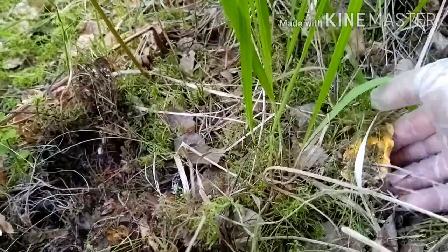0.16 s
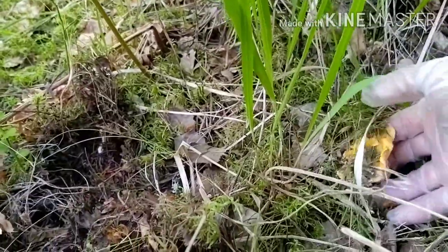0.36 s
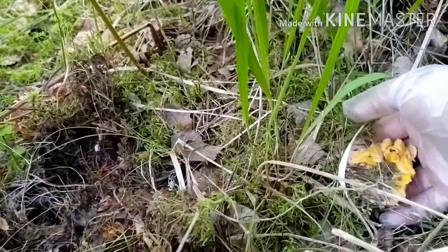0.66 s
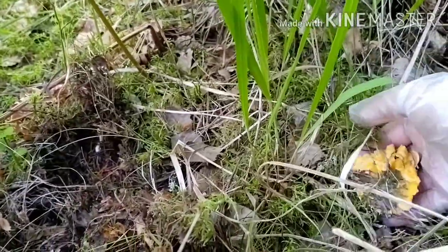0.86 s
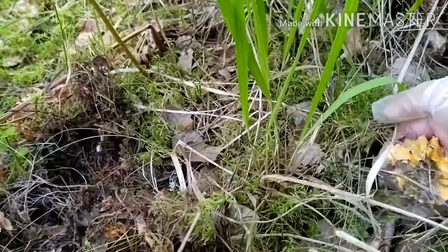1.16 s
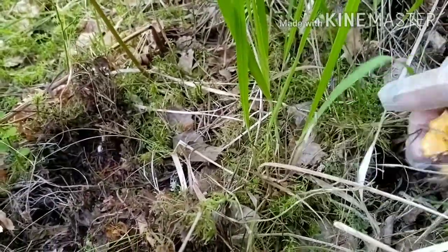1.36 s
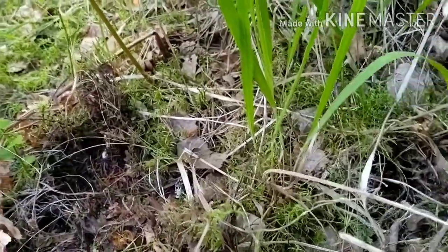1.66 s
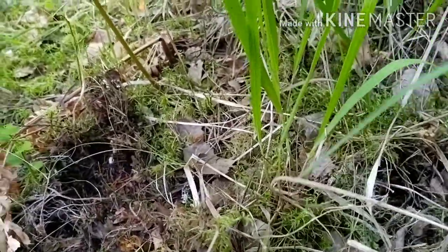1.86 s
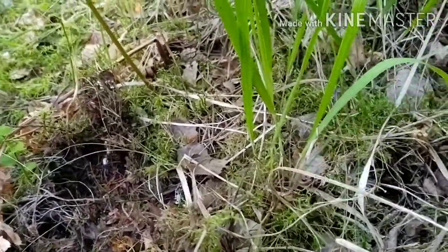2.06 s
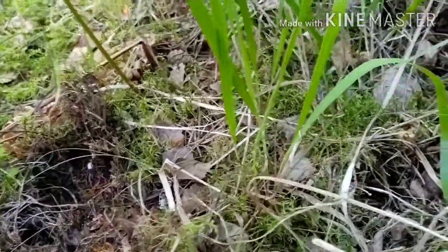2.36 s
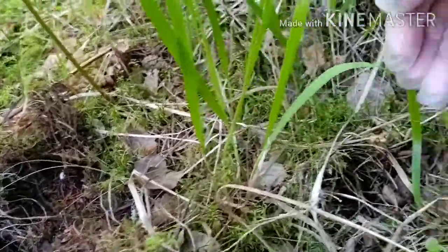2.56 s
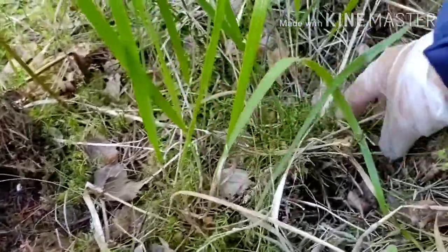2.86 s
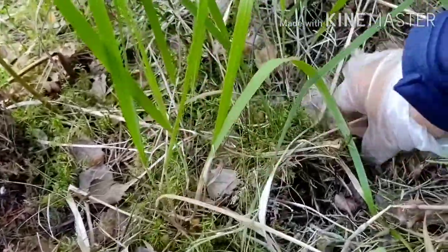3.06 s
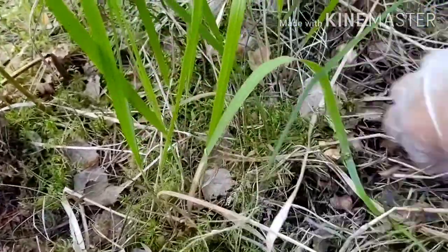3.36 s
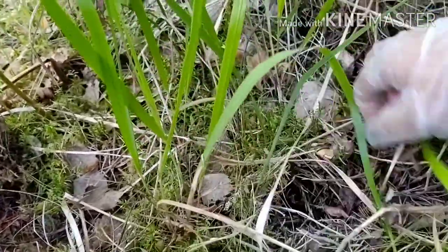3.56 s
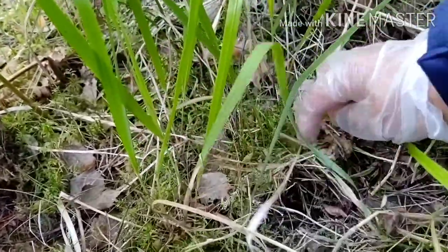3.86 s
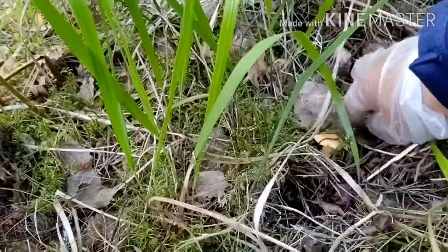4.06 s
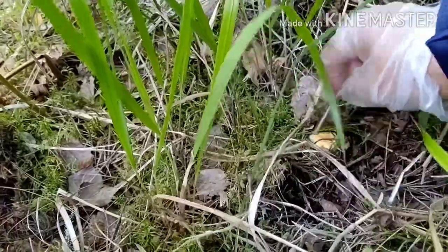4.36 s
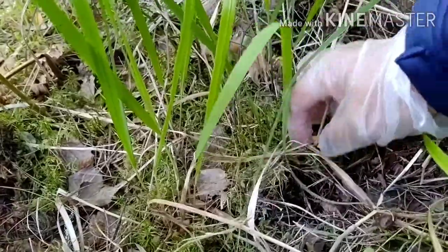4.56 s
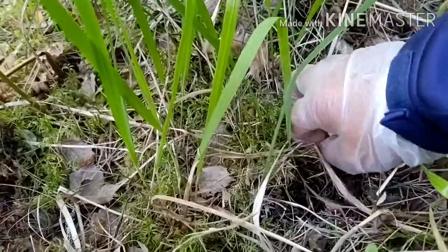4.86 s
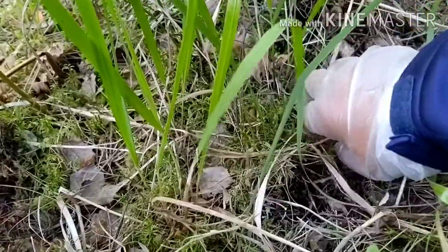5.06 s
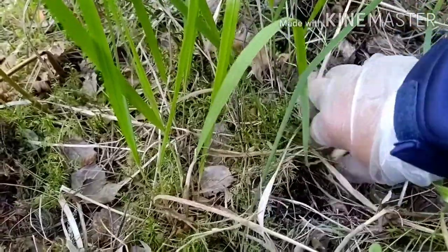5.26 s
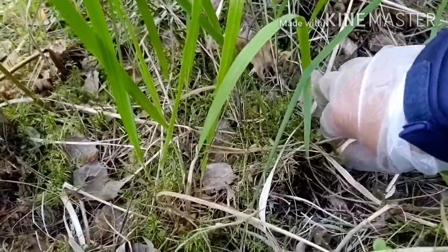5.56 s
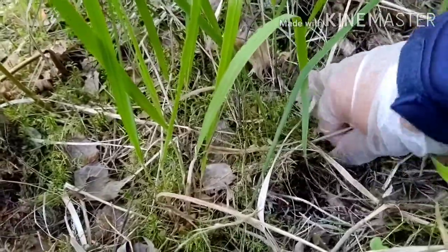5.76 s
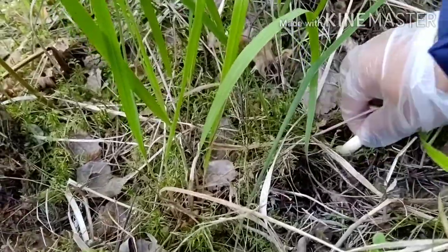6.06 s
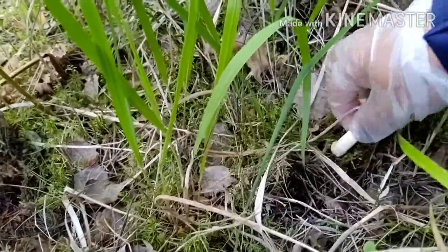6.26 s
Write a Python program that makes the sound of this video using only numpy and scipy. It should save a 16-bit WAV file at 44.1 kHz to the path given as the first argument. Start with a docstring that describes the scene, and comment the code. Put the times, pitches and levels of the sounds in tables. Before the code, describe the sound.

Close and mostly to the right, a thin plastic glove moves through grass and moss in quiet, dry woodland. A small burst of crinkles and snaps opens the scene, followed by faint, sparse rustles until about 1.1 s. The crinkling then swells, with sharp crease snaps near 1.55-1.6 s. From 1.8 to 3.1 s it is brighter and nearly continuous, with grass scraping below; a soft deep thump at 1.9 s and muffled hollow swells around 2-2.2 s. The loudest crackle comes at 3.2-3.45 s, with crisp snaps and a dull knock. Another thump and hollow swell come at 3.8 s, then moss tears in a quick volley at 4.13 s. After 4.3 s only light scrapes remain, with twig clicks and knocks around 4.6, 4.8 and 5.3 s, a firmer rustle and knock at 5.9 s, and tiny ticks until 6.4 s. Low rumble, thin hiss and a faint wavering motor drone lie behind.

```python
"""Small crinkles and snaps, close by and to the right: a gloved hand works through grass and moss in a quiet woodland.
The thin plastic film buckles in dense tiny slips, blades and litter scrape along it, creases and stalks snap.
One tuft of moss tears loose in a volley of breaks; fingers knock on the ground and click twigs, both rung as resonances.
Two soft, deep thumps are short sine bursts; muffled, hollow swells are uneven noise in a few resonances.
Behind lie a low rumble and a thin hiss of coloured noise, and a faint drone of two wavering sines."""
import sys
import numpy as np
from scipy import signal
from scipy.fft import rfft, irfft
from scipy.io import wavfile
from scipy.ndimage import uniform_filter1d

SR = 44100
rng = np.random.default_rng(int(sys.argv[2]) if len(sys.argv) > 2 else 0)


def inscribe(sig):
    """Save sig as 16-bit PCM at rate SR to the path in sys.argv[1].

    A 1-D sig is mono; a 2-D sig holds one channel per row.
    Samples are clipped to [-1, 1] before scaling.
    """
    pcm = np.round(np.clip(np.atleast_2d(sig).T, -1, 1) * 32767)
    wavfile.write(sys.argv[1], SR, pcm.astype(np.int16))


N = 282240   # samples, 6.4 s


def from_db(db):
    """Decibels to gain."""
    return 10 ** (np.asarray(db) / 20)


def rms_one(x):
    """Scale so that the mean of the channels has rms 1."""
    middle = np.atleast_2d(x).mean(axis=0)
    return x / np.sqrt(np.mean(middle ** 2) + 1e-20)


def in_time(rows):
    """Interpolate each column of a time curve to every sample."""
    s, *columns = np.transpose(rows)
    return [np.interp(np.arange(N) / SR, s, c) for c in columns]


def colour(x, spectrum):
    """Filter by a gain curve in dB, interpolated over log frequency."""
    hz, db = np.transpose(spectrum)
    grid_hz = np.maximum(np.fft.rfftfreq(N, 1 / SR), 1)
    gain_db = np.interp(np.log(grid_hz), np.log(hz), db)
    return irfft(rfft(x) * from_db(gain_db), N)


def drift(rate_hz):
    """Smooth chance bounded at 2, spread about 1, changing about rate_hz times a second."""
    grid_hz = np.fft.rfftfreq(N, 1 / SR)
    lowpass = 1 / (1 + (grid_hz / rate_hz) ** 2)
    slow = rms_one(irfft(rfft(rng.standard_normal(N)) * lowpass, N))
    return 2 * np.tanh(slow / 2)


def wander(x, depth_db, rate_hz, count=14):
    """As the contact moves over new folds and blades, the level of each band drifts by itself."""
    spectrum, out = rfft(x), 0
    place = np.sqrt(np.linspace(0, 1, spectrum.shape[-1])) * (count - 1)
    for k in range(count):
        band = np.maximum(1 - np.abs(place - k), 0)
        out = out + irfft(spectrum * band, N) * from_db(depth_db * drift(rate_hz))
    return out


def resonate(x, hz, width_hz):
    """Two-pole resonance with gain 1 on top."""
    r = np.exp(-np.pi * width_hz / SR)
    zeros = np.array([1, 0, -1]) * (1 - r * r) / 2
    poles = [1, -2 * r * np.cos(2 * np.pi * hz / SR), r * r]
    return signal.lfilter(zeros, poles, x + 1e-18)


def ring_width_hz(t60_s):
    """Bandwidth of a resonance that falls 60 dB in t60_s."""
    return np.log(1000) / (np.pi * t60_s)


def pan(x, left_db):
    """Tilt a pair between the channels by left minus right dB; equal channels keep their power."""
    gains = np.array([from_db(left_db) * np.ones(N), np.ones(N)])
    return x * gains / np.sqrt(np.mean(gains ** 2, axis=0))


LEFT_LAG_S = .000475   # the left side is further from the hand


def to_both_sides(x, scatter_db, scatter_s, lag_s=LEFT_LAG_S):
    """Direct sound reaches the left late; a brief scattered tail follows, different on each side."""
    t = np.arange(SR // 50) / SR
    paths = rng.standard_normal((2, len(t))) * np.exp(-t / scatter_s)
    paths *= from_db(scatter_db) / np.sqrt(np.sum(paths ** 2, axis=1, keepdims=True))
    lag_samples = round(lag_s * SR + rng.normal(0, 1))
    paths[0, max(lag_samples, 0)] += 1
    paths[1, 0] += 1
    pair = signal.oaconvolve(x[None], paths, axes=1)[:, :len(x)]
    return pair / np.sqrt(1 + from_db(2 * scatter_db))


def wide_noise(spectrum, side_db):
    """Coloured stereo noise; side_db sets the difference signal against the common one."""
    mid, side = rng.standard_normal((2, N))
    return rms_one(colour(mid + from_db(side_db) * side * [[1], [-1]], spectrum))


# Spectra of the far rumble and of the air hiss. Each row: frequency in Hz, relative density in dB per Hz.
RUMBLE = [(20, -34), (42, -32), (60, -6.5), (82, -12), (105, -1.5), (128, 4), (165, 0), (210, -4.5),
          (260, -7.5), (340, -22.5), (600, -20.5), (2000, -68), (16000, -66)]
AIR = [(100, -1), (400, -2), (540, -3), (680, 6), (850, -9.5), (1100, 5.5), (1400, -12), (1800, 9.5),
       (3000, -1.5), (6000, 6.5), (16000, -22)]
# Far motor. Each row: time in seconds, level of the low note in dB, level of its octave in dB.
DRONE = [(0, -78, -75), (1.0, -99, -71.5), (1.6, -87, -75.5), (3.7, -74.5, -78), (4.0, -74.5, -67),
         (4.9, -78, -68), (5.3, -70.5, -75.5), (5.9, -64, -88), (6.4, -66.5, -75)]
DRONE_HZ = 102.15   # centre of the wavering low note


def woodland(rumble_db, air_db, rumble_side_db, air_side_db):
    """Far rumble nearly alike on both sides, a thin wide hiss of air, and a wavering motor note with its octave."""
    low_db, octave_db = in_time(DRONE)
    note_hz = DRONE_HZ * (1 + 0.00713 * drift(2.8))
    phase = 2 * np.pi * np.cumsum(note_hz) / SR
    drone = np.sqrt(2) * (from_db(low_db) * np.sin(phase) + from_db(octave_db) * np.sin(2 * phase))
    far = from_db(rumble_db) * wide_noise(RUMBLE, rumble_side_db) + drone
    return pan(far, left_db=-0.5) + from_db(air_db) * wide_noise(AIR, air_side_db)


# Muffled, hollow swells of noise. Each row: middle in seconds, level in dB,
# seconds from the middle to 1/e of the power.
SWELLS = [(0.132, -73.5, 0.17), (1.986, -65, 0.064), (2.1, -63, 0.011), (2.173, -65, 0.091),
          (3.777, -62.5, 0.038), (3.835, -58.5, 0.026), (3.883, -61, 0.043)]
# Hollow resonances. Each row: frequency in Hz, relative level in dB, width in Hz.
SWELL_RESONANCES = [(490, -7.5, 140), (664, 0.5, 134), (835, -2.5, 200), (1760, -10, 300)]


def hollow_swells(rough_db, left_db):
    """Uneven, muffled noise swells and fades in a few hollow resonances."""
    t = np.arange(N) / SR
    power = 0
    for middle_s, db, half_s in SWELLS:
        power = power + from_db(db) ** 2 * np.exp(-np.minimum(((t - middle_s) / half_s) ** 2, 50))
    uneven_noise = rng.standard_normal(N) * from_db(rough_db * drift(40))
    hollow = 0
    for k, (hz, db, width_hz) in enumerate(SWELL_RESONANCES):
        hollow = hollow + from_db(db) * resonate(uneven_noise, hz, width_hz) * (-1) ** k
    pair = rms_one(to_both_sides(hollow, scatter_db=-5.5, scatter_s=0.0022, lag_s=.0001))
    return pan(np.sqrt(power) * pair, left_db)


# Soft, deep thumps. Each row: start in seconds, peak in dB, length in seconds, frequency in Hz.
THUMPS = [(1.92, -52, 0.049, 200), (3.804, -46.5, 0.041, 200)]


def thumps():
    """Each thump is a short low sine burst that swells and fades, alike on both sides."""
    out = np.zeros(N)
    for start_s, peak_db, length_s, hz in THUMPS:
        t = np.arange(N) / SR - start_s
        swell = np.sin(np.pi * np.clip(t / length_s, 0, 1))
        out += from_db(peak_db) * swell * np.sin(2 * np.pi * hz * t)
    return out


# Fingers meeting the ground. Each row: start in seconds, relative strength of the push in dB.
KNOCKS = [(3.357, -42), (4.598, -52), (5.3, -47.5), (5.9038, -42.5)]
# Ringing of packed moss and roots. Each row: frequency in Hz, relative level in dB, 60 dB decay in seconds.
GROUND = [(490, -13, 0.0057), (595, 13.5, 0.032), (644, 5.5, 0.02), (1020, -13, 0.012), (1780, 4, 0.008)]


def knocks(level_db, press_s, crush_share, crush_s):
    """A fingertip gives the ground one short push, crushing a little moss, and the ground answers dully."""
    push, t = np.zeros(N), np.arange(SR // 20) / SR
    press = t / press_s * np.exp(1 - t / press_s)
    for start_s, push_db in KNOCKS:
        start = round(start_s * SR)
        crush = crush_share * rng.standard_normal(len(t)) * np.exp(-t / crush_s)
        push[start:start + len(t)] += from_db(push_db) * (press + crush)
    body = sum(from_db(db) * resonate(push, hz, ring_width_hz(t60_s)) for hz, db, t60_s in GROUND)
    return from_db(level_db) * to_both_sides(body, scatter_db=-40, scatter_s=0.001)


# Thin twigs under the fingertips. Each row: start in seconds, relative level in dB, pitch in Hz.
TWIG_TICKS = [(4.5985, -46, 1100), (4.769, -45, 1350), (4.7945, -50, 1500), (4.9045, -53, 1300),
              (5.2995, -49, 1120), (6.2835, -51, 1450)]
# Modes of a twig. Each row: multiple of its pitch, relative level in dB, 60 dB decay in seconds.
TWIG = [(1.0, 6, 0.0071), (1.3, -1, 0.015), (1.62, -1, .01)]
TWIG_CRACK_DB = -23   # the bare crack beside the ring


def twigs(level_db, crack_s):
    """A twig gives a tiny crack and rings briefly, damped by the moss."""
    out, t = np.zeros((2, N)), np.arange(SR // 25) / SR
    for start_s, db, pitch_hz in TWIG_TICKS:
        crack = 0.22 * rng.standard_normal(len(t)) * np.exp(-t / crack_s)
        crack[0] += 1
        ring = from_db(TWIG_CRACK_DB) * resonate(crack, hz=3000, width_hz=4000)
        for k, (ratio, mode_db, t60_s) in enumerate(TWIG):
            mode = resonate(crack, ratio * pitch_hz, ring_width_hz(t60_s))
            ring = ring + from_db(mode_db) * mode * (-1) ** k
        tick = to_both_sides(ring / np.abs(ring).max(), scatter_db=-22, scatter_s=.001, lag_s=.00012)
        start = round(start_s * SR)
        out[:, start:start + len(t)] += from_db(db + level_db) * tick
    return out


# Spectrum of parting fibres. Each row: frequency in Hz, relative density in dB per Hz.
TEAR = [(100, -24), (330, -20), (480, -3), (750, -8), (1300, -5), (2100, -1.5), (3100, 3), (4400, 0),
        (6200, -1), (8000, 4.5), (16000, -14)]
TEAR_START_S, TEAR_SWELL_S, TEAR_FADE_S, TEAR_DB = 4.129, .015, .012, -37.5


def tear(fibres_per_s, spread_db, lag_s):
    """Fibres part in a quick dry volley that builds until the tuft lets go."""
    t = np.arange(N) / SR - TEAR_START_S
    fade = np.exp(-np.clip((t - TEAR_SWELL_S) / TEAR_FADE_S, 0, 20))
    pull = np.clip(t / TEAR_SWELL_S, 0, 1) * fade
    sizes = from_db(spread_db * rng.standard_normal(N)) * rng.choice([-1, 1], N)
    breaks = (rng.random(N) < fibres_per_s / SR) * sizes
    pair = to_both_sides(breaks, scatter_db=-10.0, scatter_s=0.0014, lag_s=lag_s)
    return from_db(TEAR_DB) * pull * rms_one(colour(pair, TEAR))


def grains(per_s, spread_db, clump_db, clump_hz, runs_per_s, run_db, run_s, scatter_db, scatter_s, count=32):
    """Tiny slips come in clumps, and now and then a short run sets in; each fold scatters in its own way."""
    sizes = from_db(spread_db * np.minimum(rng.exponential(1, N), 3.5)) * rng.choice([-1, 1], N)
    triggers = (rng.random(N) < runs_per_s / SR) * np.minimum(rng.exponential(1, N), 1.7)
    runs = signal.lfilter([from_db(run_db)], [1, -np.exp(-1 / (run_s * SR))], triggers + 1e-18)
    slips = sizes * (rng.random(N) < per_s / SR) / np.sqrt(per_s)
    slips = slips * from_db(clump_db * drift(clump_hz)) * (1 + runs)
    # a few folds are in play at a time; each run brings the next one
    fold = (np.cumsum(triggers > 0) + rng.integers(0, 4, N)) % count
    out = sum(to_both_sides(slips * (fold == k), scatter_db, scatter_s) for k in range(count))
    # the hand's pressure, not chance, sets the strength of a stroke: level out over 0.1 s
    return out / np.sqrt(uniform_filter1d(np.mean(out ** 2, axis=0), size=SR // 10) + 1e-12)


# Spectrum of dry litter, shared with the stalks. Each row: frequency in Hz, relative density in dB per Hz.
LITTER = [(30, -68), (150, -8.5), (350, -11), (600, -3.5), (1000, -5.5), (1400, -3), (1850, -2), (3000, -2),
          (5000, -3), (7500, -7), (11000, -8.5), (16000, -5)]


def grass(level_db):
    """Blades and dry litter stick and slip along the glove; a firmer push also stirs the dull moss beneath."""
    per_s = 4500 * from_db(.9 * (level_db + 55))
    slips = grains(per_s, spread_db=1.5, clump_db=1.35, clump_hz=40.5, runs_per_s=90, run_db=-4.5,
                   run_s=0.00071, scatter_db=8.0, scatter_s=0.0018)
    scrape = rms_one(colour(wander(slips, depth_db=2.0, rate_hz=5.7), LITTER))
    moss = colour(scrape, [(1200, 0), (1700, -30)])
    # a light touch misses the moss, and a fast sweep rides over it
    push_db = np.interp(level_db, [-70, -58, -47], [-6, 2.5, -.8])
    return from_db(level_db + 1.0) * (scrape + (from_db(push_db) - 1) * moss)


# Creases and stalks giving way. Each row: start in seconds, level before colouring in dB, length in seconds,
# woody part relative to that level in dB, woody ring in Hz.
SNAPS = [(0.026, -34, .002, -26, 2400), (0.0543, -31, .002, -28, 2400), (0.058, -30, 0.0047, -31, 2400),
         (0.092, -41, 0.0056, -32, 2400), (0.121, -29, 0.0027, -40, 2400), (0.393, -35, 0.0049, -21, 2400),
         (0.4065, -33, .0015, -19, 2400), (0.4985, -39.5, 0.0023, -8, 2080),
         (0.539, -39.5, 0.0016, -4, 2100), (0.5712, -40, 0.0011, -20, 2400), (0.5868, -30, .001, -22, 2390),
         (0.866, -44, .0015, -15, 2400), (1.086, -43, .006, -24, 2415), (1.295, -29, 0.00081, -30, 2400),
         (1.308, -28.5, 0.0035, -20, 2400), (1.5425, -21, .0012, -26, 4200), (1.5445, -27, .004, -18, 4200),
         (1.5598, -26, .0008, -28, 4200), (1.5908, -19, .002, -40, 4200), (1.5929, -10.5, .0016, -38, 4200),
         (1.659, -26, .0015, -16, 2400), (1.894, -32, .001, -30, 2400), (1.906, -26, 0.002, -30, 2400),
         (2.036, -29, 0.0012, -15, 2900), (2.063, -24, 0.0016, -26, 2400), (2.154, -27, 0.0054, -32, 2400),
         (2.25, -30.5, .003, -18, 2400), (2.311, -39, .003, -20, 2400), (2.382, -26, .002, -25, 2400),
         (2.432, -24, 0.011, -21, 1790), (2.504, -29.5, 0.0015, -13, 1400), (2.595, -24, 0.0042, -15, 1500),
         (2.641, -32, .001, -22, 2360), (2.754, -25, .0012, -25, 2410), (2.98, -24.5, 0.0095, -17, 2570),
         (3.085, -22.5, 0.0028, -23, 2400), (3.144, -33, .002, -25, 2400), (3.277, -29, .002, -1.5, 3300),
         (3.285, -28, .0015, -5, 3100), (3.3025, -19, 0.0012, -12, 7200), (3.3072, -24, .002, -13, 4600),
         (3.3447, -24, .0008, -13, 4000), (3.3835, -24, .0013, -18, 5800), (3.4, -27, .0016, -20, 5000),
         (3.4037, -18, .001, -21, 4600), (3.4283, -25, .0012, -18, 5000), (3.4405, -25, .0012, -18, 5000),
         (3.514, -28, .002, -24, 5000), (3.661, -23, 0.001, -24, 5000), (3.714, -29, .001, -24, 4200),
         (3.73, -22, 0.0012, -32, 4200), (3.833, -32, 0.00081, -26, 4200), (4.058, -31, 0.0018, -8, 2000),
         (4.099, -32, .0007, -22, 3600), (4.1105, -31, .002, -7, 1200), (4.1245, -28, .002, -20, 3600),
         (4.13, -22, 0.0008, -18, 3600), (4.165, -28, .0015, -14, 5500), (4.223, -30, .001, -15, 2000),
         (4.5975, -39, 0.0022, -1, 1700), (4.649, -42, .001, -4, 1700), (4.768, -37, .002, -6, 1750),
         (4.793, -37, .0012, -9, 2200), (4.824, -38, 0.009, -13, 6000), (4.9035, -40, .0016, -3, 2600),
         (5.2995, -46, .002, 0, 1300), (5.349, -45, .003, -8, 4600), (5.49, -47, .0031, -3.5, 2000),
         (5.687, -39.5, 0.014, -16, 2000), (5.7205, -41, 0.0006, 1, 3500), (5.8715, -40, .002, -3, 2000),
         (5.9045, -32, .0015, -8, 3600), (5.908, -32, .003, -13, 3000), (5.9215, -36, .001, -10, 1700),
         (5.9294, -31, .002, -13, 2400), (5.932, -35, 0.0038, -18, 2400), (6.021, -29, .0015, -22, 2400),
         (6.028, -31, .002, -26, 2400), (6.149, -39, .001, -19, 2400), (6.123, -40, 0.0023, -12, 2400),
         (6.198, -43.5, 0.012, -10, 1890), (6.282, -45, 0.0053, -2, 1890),
         (6.305, -41.5, 0.0046, -15, 2400), (6.365, -44, 0.0046, -1.5, 1900)]
# Spectrum of a snapping crease. Each row: frequency in Hz, gain in dB.
CREASE = [(300, -54), (2000, -37), (5000, -22.5), (7200, -12.5), (8600, -2), (11500, -1.5), (14700, -3),
          (16000, -8)]
SOFT_SNAP_TOP_DB = -6   # a gentle crease has less of the highest treble than a hard snap


def snaps(stalk_db, tail_s):
    """A crease gives way in a noise run that swells and dies within milliseconds; a dry stalk adds a woody ring."""
    film, soft, stalk, ring = np.zeros((4, 2, N))
    t = np.arange(SR // 32) / SR
    for start_s, peak_db, length_s, woody_db, ring_hz in SNAPS:
        fade = np.exp(-np.maximum(t - .7 * length_s, 0) / (length_s / 3))
        swell = np.minimum(t / (length_s / 4), 1) * fade
        run = to_both_sides(swell * rng.standard_normal(len(t)), scatter_db=-23, scatter_s=tail_s)
        # both sides get the energy of the swell
        run *= from_db(peak_db) * np.sqrt(np.sum(swell ** 2) / np.sum(run ** 2, axis=1, keepdims=True))
        own_ring = resonate(run, ring_hz, width_hz=550)
        softness = np.interp(peak_db, [-26, -18], [1, 0])
        start = round(start_s * SR)
        span, room = slice(start, start + len(t)), N - start
        film[:, span] += run[:, :room]
        soft[:, span] += softness * run[:, :room]
        stalk[:, span] += from_db(woody_db) * run[:, :room]
        ring[:, span] += from_db(woody_db) * own_ring[:, :room]
    woody = colour(stalk, LITTER) + ring
    soft_top = colour(soft, [(9500, -40), (12500, 0)])
    film = film + (from_db(SOFT_SNAP_TOP_DB) - 1) * soft_top
    return colour(film, CREASE), from_db(stalk_db) * woody


# Strokes through the grass. Each row: start in seconds, swell in seconds, hold in seconds,
# glove crinkle in dB, grass scrape in dB.
STROKES = [(0.0, 0.0011, 0.035, -48.5, -66), (0.091, .006, 0.1, -56, -69), (0.277, 0.042, .025, -57, -69),
           (0.366, 0.023, 0.023, -56.5, -65), (0.398, 0.099, 0.097, -51.5, -67),
           (0.606, 0.02, 0.043, -56, -65), (0.758, 0.02, 0.012, -60.5, -65.5),
           (0.999, 0.029, 0.021, -54, -66.5), (1.095, 0.0082, 0.023, -53, -68.5),
           (1.125, 0.23, .29, -44, -65.5), (1.595, 0.07, 0.17, -41.5, -60.5),
           (1.829, 0.056, 0.087, -41.5, -58.5), (1.982, 0.038, 0.06, -44.5, -55),
           (2.082, 0.043, 0.11, -44, -57.5), (2.275, 0.11, 0.13, -44.5, -57),
           (2.503, 0.039, 0.49, -39.5, -56.5), (3.029, 0.04, 0.078, -41.5, -54),
           (3.18, 0.086, 0.018, -42, -52), (3.264, 0.018, 0.078, -34, -47.5),
           (3.36, 0.024, 0.076, -36.5, -55), (3.453, 0.031, 0.35, -44, -60.5),
           (3.831, 0.078, 0.27, -45.5, -60.5), (4.104, 0.022, 0.039, -37, -54.5),
           (4.163, 0.037, 0.048, -43.5, -57), (4.309, 0.05, 0.023, -49, -62),
           (4.504, 0.034, 0.11, -53, -65.5), (4.733, 0.034, 0.014, -51, -66),
           (4.889, 0.0034, 0.019, -50, -62), (4.91, 0.016, 0.33, -79, -67.5),
           (5.477, 0.0046, 0.023, -58.5, -64), (5.634, 0.039, 0.082, -55.5, -65.5),
           (5.799, 0.082, 0.14, -49.5, -61), (6.108, 0.034, 0.071, -58.5, -69),
           (6.279, 0.097, 0.033, -53, -62.5)]
# Fingers fidgeting in the moss. Each row: time in seconds, glove crinkle in dB, grass scrape in dB.
FIDGET = [(0, -62.5, -67), (0.95, -67.5, -72.5), (2.2, -68, -64.5), (4.5, -61, -64), (5.1, -64.5, -67),
          (5.35, -66.5, -68), (5.38, -67.5, -73), (5.62, -64, -69.5), (5.7, -65, -69), (6.4, -61.5, -69)]
FIDGET_SWING_DB, FIDGET_RATE_HZ = 1.5, 14
RELEASE_S = 0.02   # time constant of a stroke's dying away


def hand():
    """Crinkle and scrape in dB: each stroke swells, holds and dies away, over the fidgeting of the fingers."""
    t = np.arange(N) / SR
    fidget_db = np.array(in_time(FIDGET)) + FIDGET_SWING_DB * drift(FIDGET_RATE_HZ)
    crinkle, scrape = from_db(fidget_db) ** 2
    for start_s, swell_s, hold_s, crinkle_db, scrape_db in STROKES:
        past_hold = np.clip((t - start_s - swell_s - hold_s) / RELEASE_S, 0, 20)
        power = (np.clip((t - start_s) / swell_s, 0, 1) * np.exp(-past_hold)) ** 2
        crinkle = crinkle + from_db(crinkle_db) ** 2 * power
        scrape = scrape + from_db(scrape_db) ** 2 * power
    return 10 * np.log10([crinkle, scrape])


# Spectrum of the film. Each row: frequency in Hz, relative density in dB per Hz.
FILM = [(300, -66), (1500, -22.5), (4000, -15.5), (6000, -11), (7450, -7.5), (8300, 0), (9300, 2),
        (11200, -2), (12800, -7.5), (14700, -7.5), (16000, -11)]
# How much better the glove reaches the left side. Each row: frequency in Hz, gain in dB.
LEFT_LIFT = [(3000, 4.5), (7000, 6), (8500, -1), (11000, -4), (12800, 2.5), (14800, -2.5)]
# How taut the film is. Each row: time in seconds, brightness in dB.
TAUTNESS = [(0, 1), (1.1, 0.5), (1.7, 2), (2.05, 4.5), (2.65, 1.5), (2.97, 0.5), (3.17, -2.5), (3.6, -0.5),
            (3.72, 3), (4.1, 3), (5.2, -4.5), (6.1, 0.5), (6.4, -2)]


def glove(level_db):
    """The film buckles more often the faster the hand moves; taut film sounds higher than slack film."""
    per_s = 10000 * from_db(0.45 * (level_db + 46))
    buckles = grains(per_s, spread_db=3.0, clump_db=1.0, clump_hz=74, runs_per_s=230, run_db=-3.5,
                     run_s=0.00036, scatter_db=4.0, scatter_s=0.00036)
    film = colour(buckles, FILM)
    top = colour(film, [(9500, -40), (12500, 0)])
    shoulder = colour(film, [(7300, 0), (8300, -40)])
    bright_db, = in_time(TAUTNESS)
    # tautness lifts the top and lowers the shoulder below it
    left, right = film + (from_db(bright_db) - 1) * top + (from_db(-bright_db) - 1) * shoulder
    return from_db(level_db - 1.71) * rms_one(np.array([colour(left, LEFT_LIFT), right]))


# Where the hand is. Each row: time in seconds, left minus right in dB before each layer's own offset or share.
SIDE_OF_HAND = [(0.0, -5), (0.05, -15), (0.23, -7), (0.6, -13), (0.71, -8.5), (1.57, -13), (2.37, -13),
                (2.42, -18), (2.73, -11.5), (2.99, -14.5), (3.12, -7), (3.76, -12), (4.08, -8.5),
                (4.12, -5), (4.74, -14.5), (5.2, -7.5), (5.6, -14.5), (6.4, -14)]


def scene():
    """Bright glove sound is shadowed strongly on the left, the duller grass sound less."""
    crinkle_db, scrape_db = hand()
    left_db, = in_time(SIDE_OF_HAND)
    film_snaps, stalk_snaps = snaps(stalk_db=-1.0, tail_s=0.004)
    bright = pan(glove(crinkle_db), left_db - .5) + pan(film_snaps, left_db - 4.5)
    ground = knocks(level_db=-2.5, press_s=0.00025, crush_share=0.3, crush_s=0.0029)
    ticks = twigs(level_db=-1.5, crack_s=0.00062)
    dull = pan(grass(scrape_db) + stalk_snaps + ground + ticks, 0.43 * left_db)
    tuft = tear(fibres_per_s=1900, spread_db=0.5, lag_s=0.00009)
    muffled = thumps() + hollow_swells(rough_db=2.0, left_db=-4)
    background = woodland(rumble_db=-67.5, air_db=-71.5, rumble_side_db=-14, air_side_db=0.5)
    return bright + dull + tuft + muffled + background


CUTOFF_HZ = 15700


def record(dry):
    """A steep elliptic low-pass cuts the top."""
    lowpass = signal.ellip(12, .1, 80, CUTOFF_HZ, fs=SR, output="sos")
    return signal.sosfilt(lowpass, dry)


dry = scene()
out = record(dry)
inscribe(out)
```